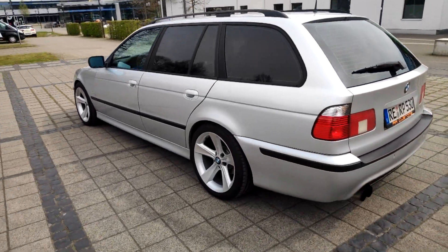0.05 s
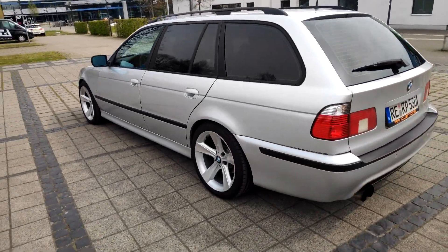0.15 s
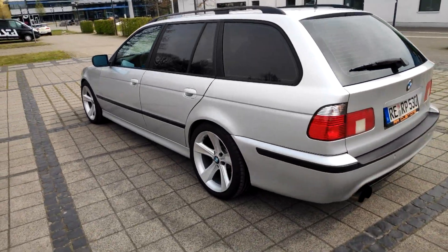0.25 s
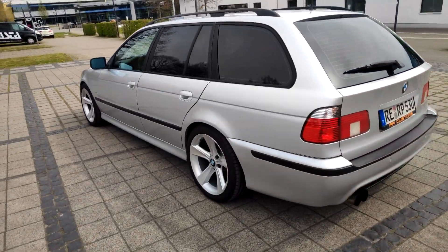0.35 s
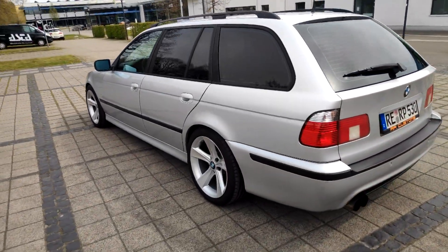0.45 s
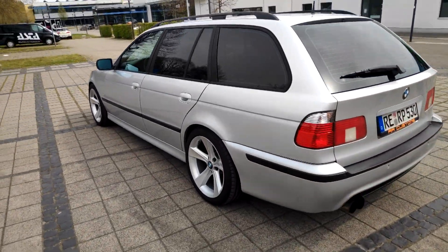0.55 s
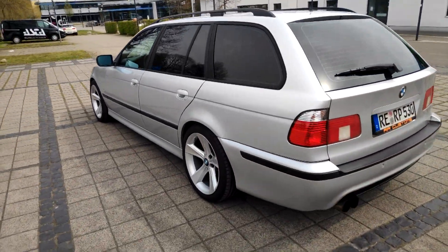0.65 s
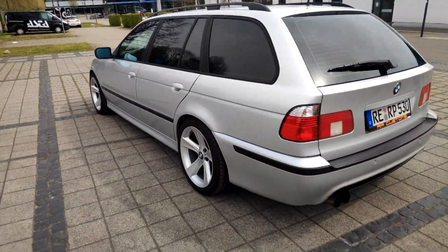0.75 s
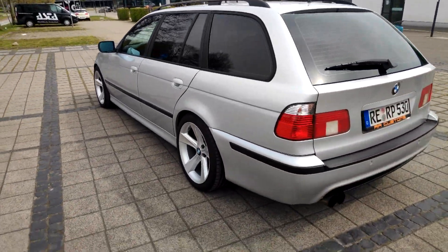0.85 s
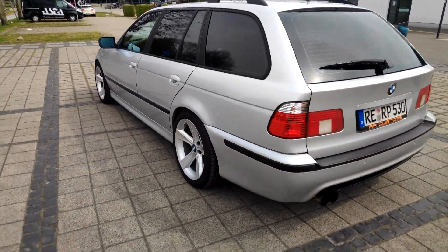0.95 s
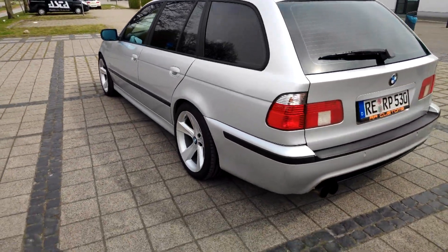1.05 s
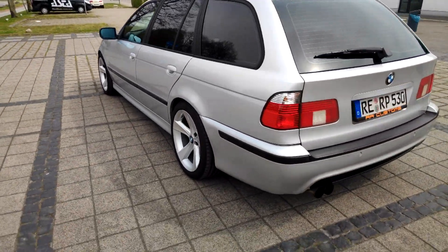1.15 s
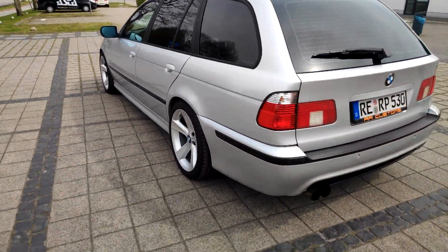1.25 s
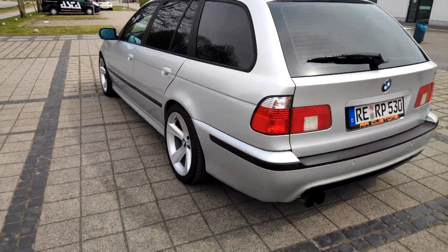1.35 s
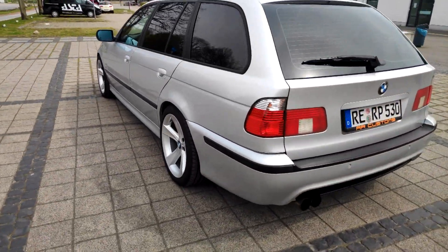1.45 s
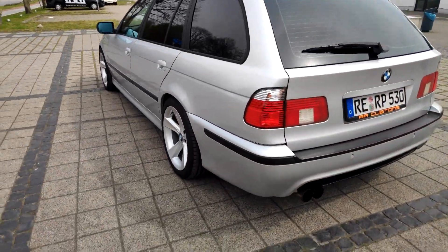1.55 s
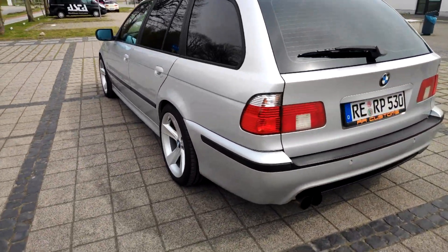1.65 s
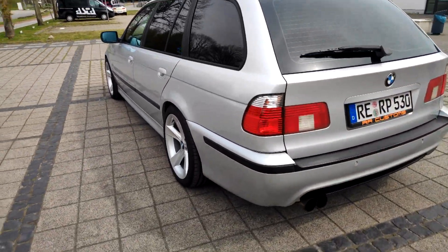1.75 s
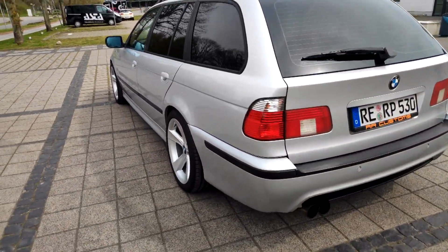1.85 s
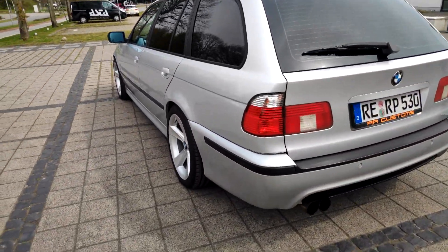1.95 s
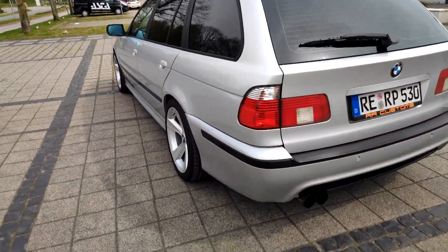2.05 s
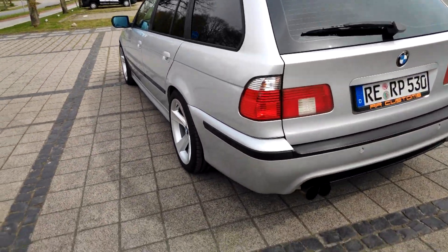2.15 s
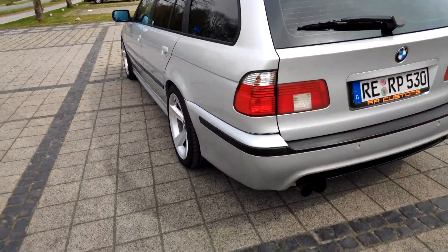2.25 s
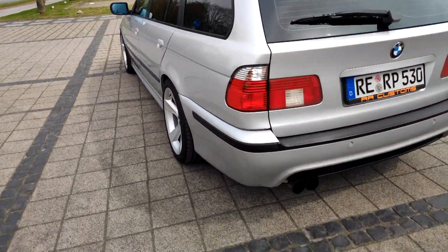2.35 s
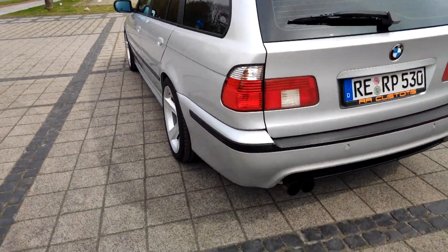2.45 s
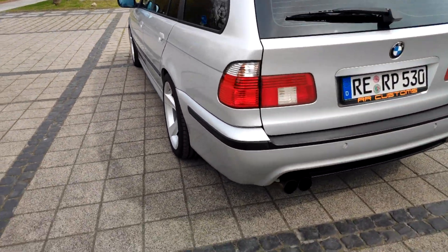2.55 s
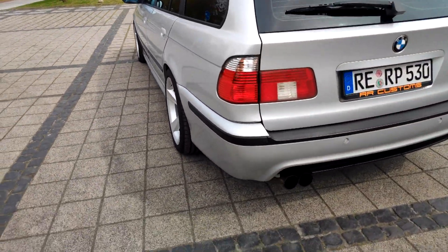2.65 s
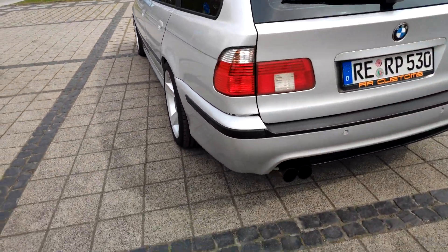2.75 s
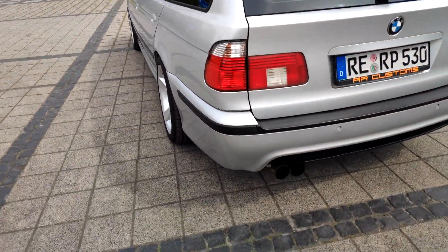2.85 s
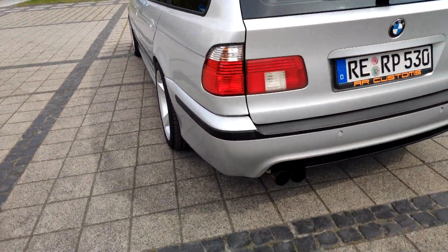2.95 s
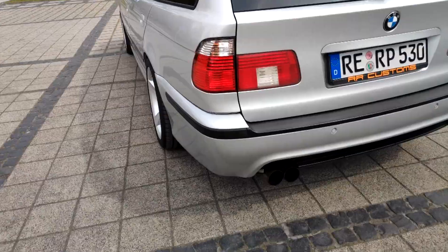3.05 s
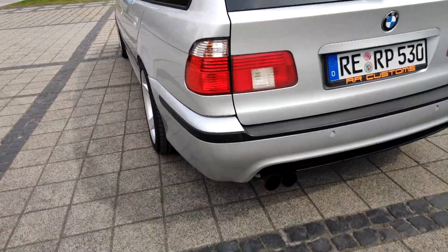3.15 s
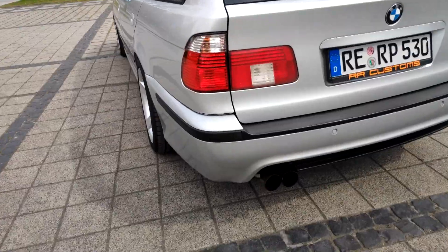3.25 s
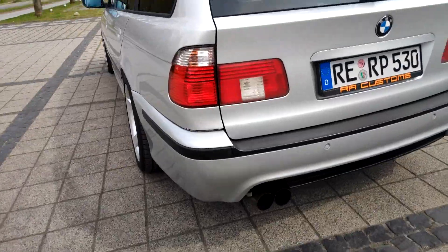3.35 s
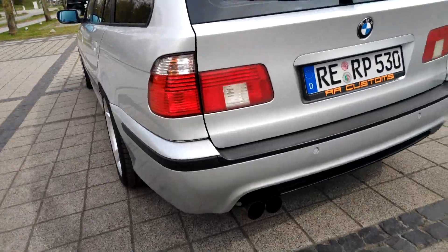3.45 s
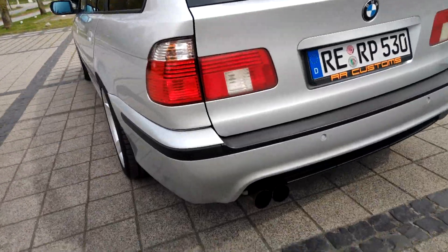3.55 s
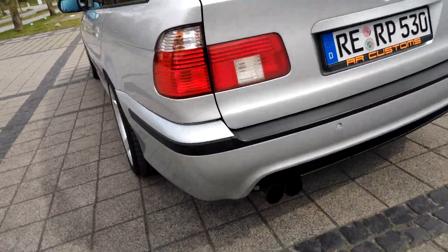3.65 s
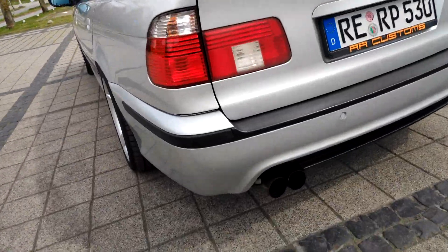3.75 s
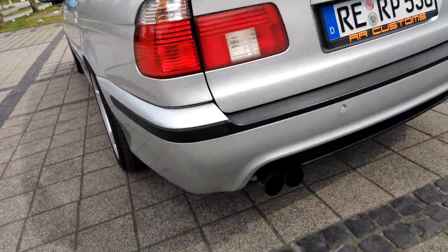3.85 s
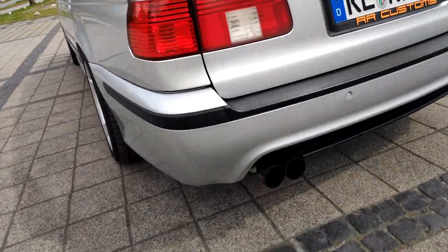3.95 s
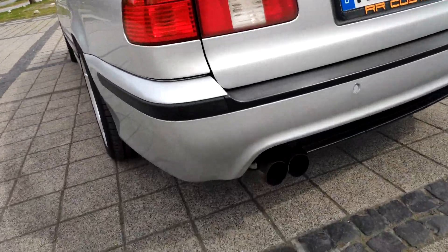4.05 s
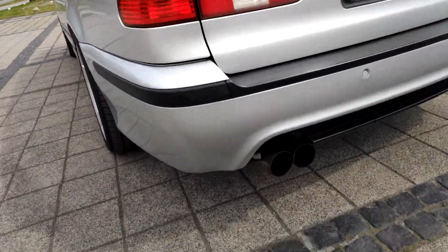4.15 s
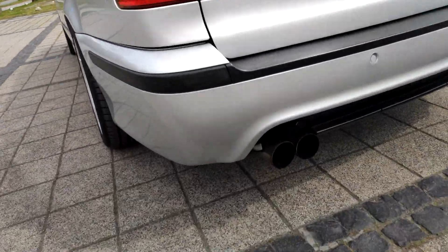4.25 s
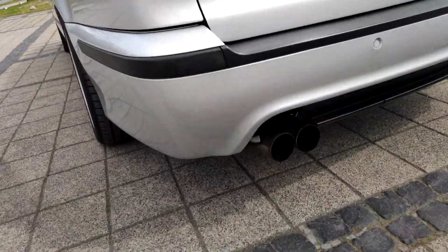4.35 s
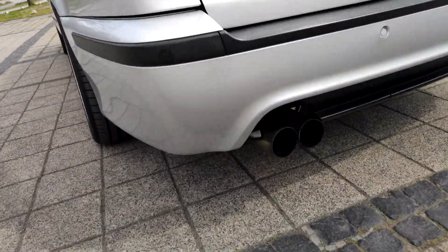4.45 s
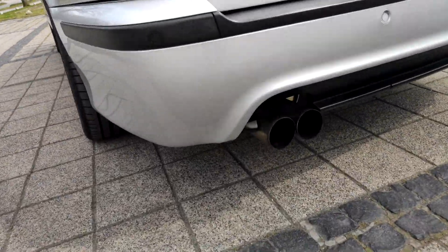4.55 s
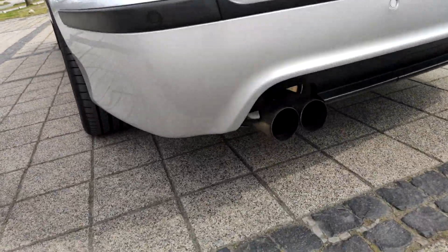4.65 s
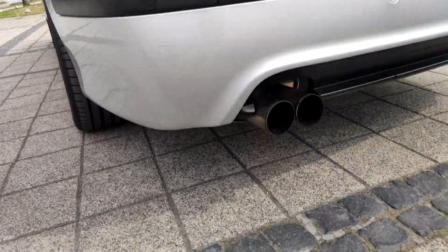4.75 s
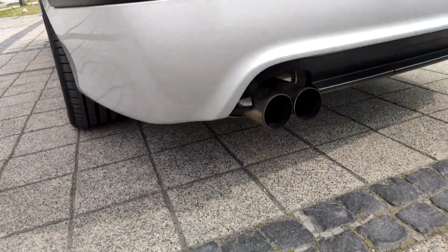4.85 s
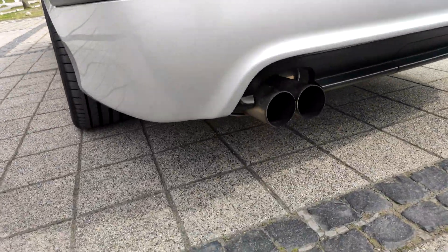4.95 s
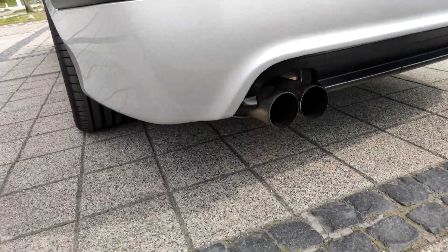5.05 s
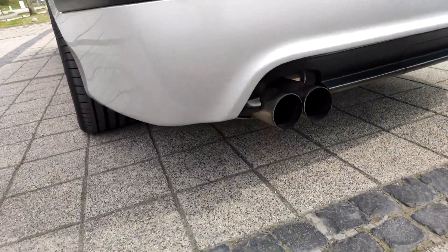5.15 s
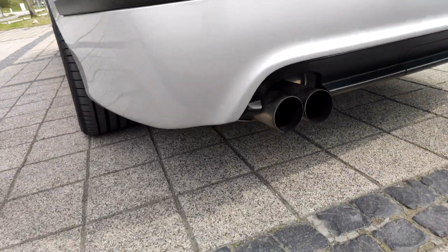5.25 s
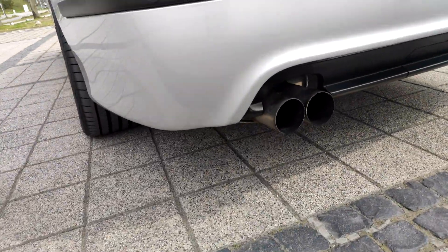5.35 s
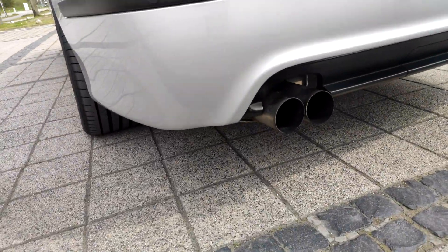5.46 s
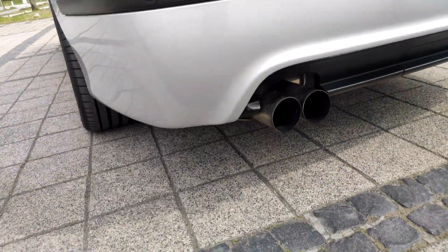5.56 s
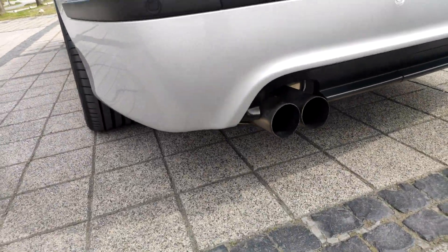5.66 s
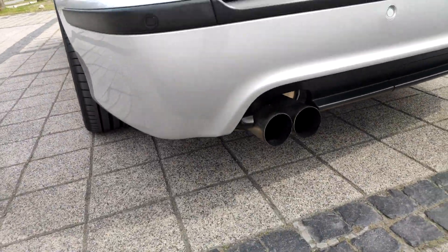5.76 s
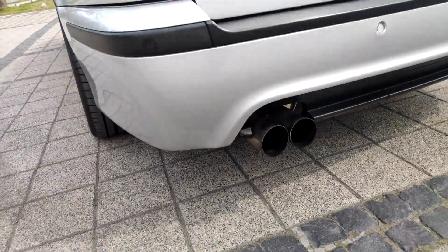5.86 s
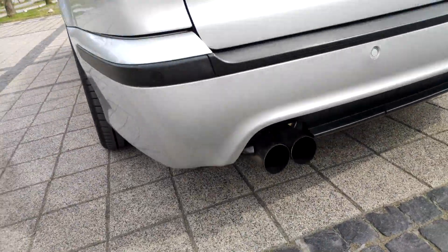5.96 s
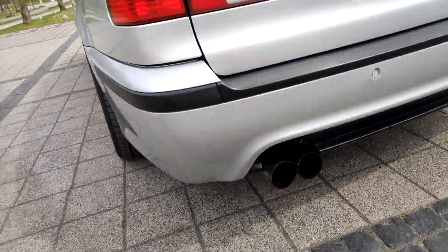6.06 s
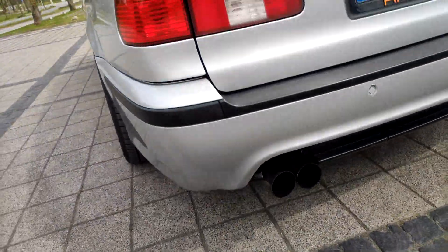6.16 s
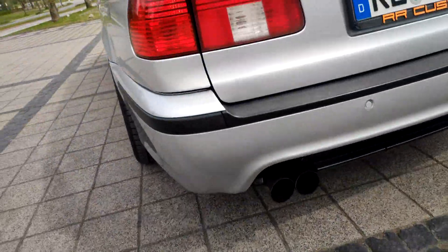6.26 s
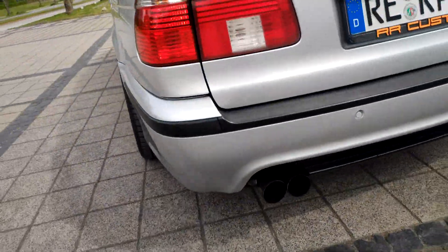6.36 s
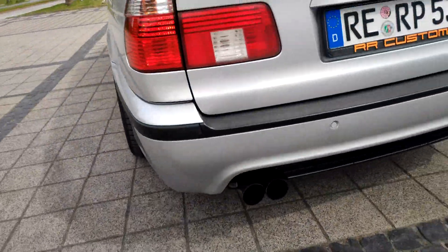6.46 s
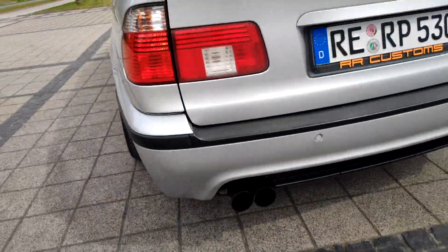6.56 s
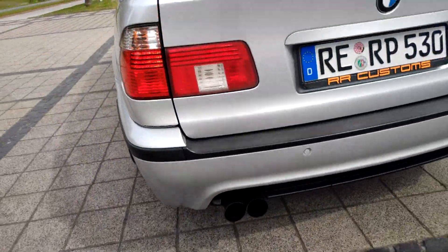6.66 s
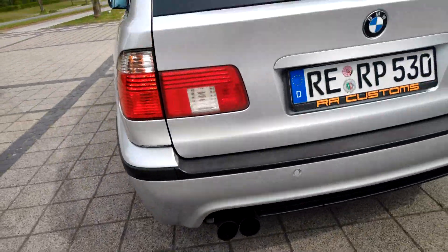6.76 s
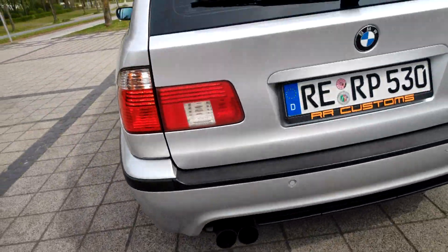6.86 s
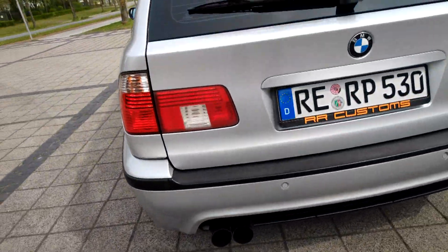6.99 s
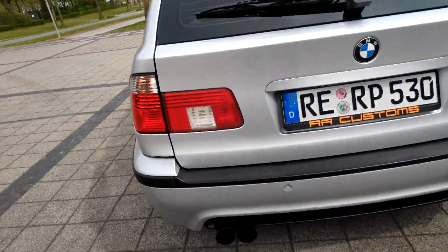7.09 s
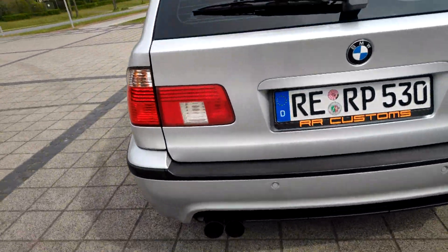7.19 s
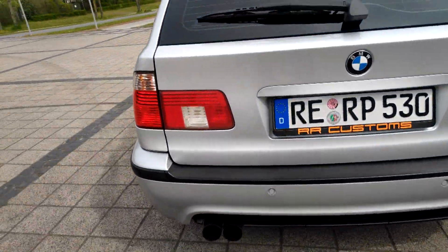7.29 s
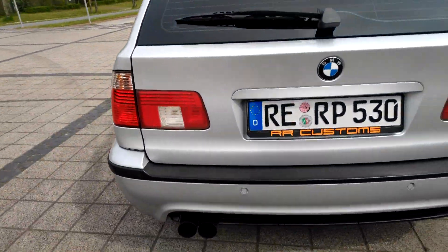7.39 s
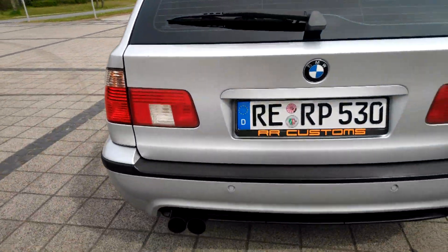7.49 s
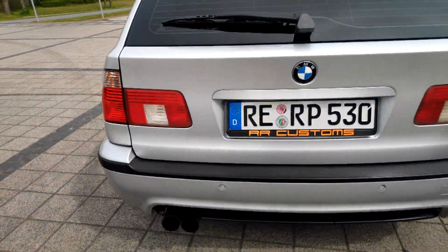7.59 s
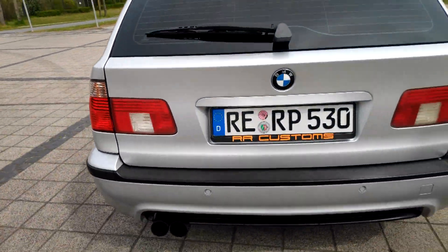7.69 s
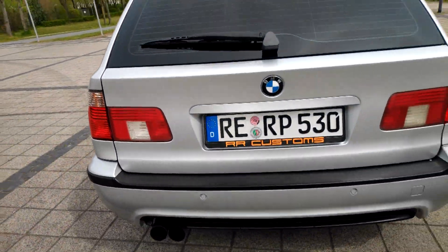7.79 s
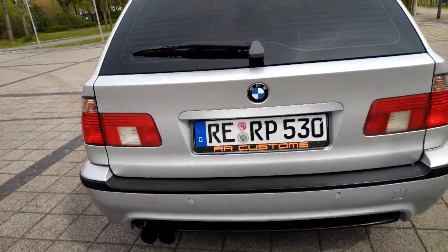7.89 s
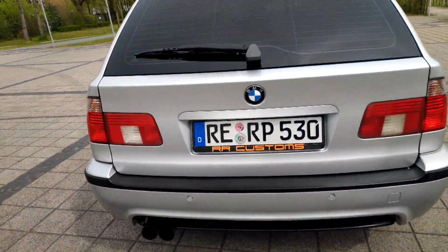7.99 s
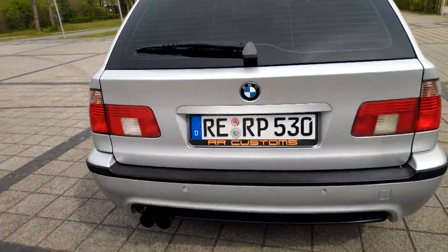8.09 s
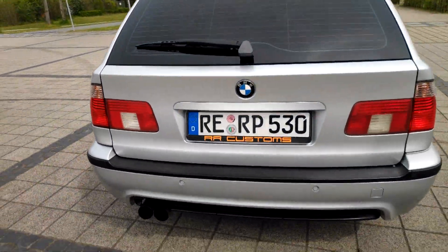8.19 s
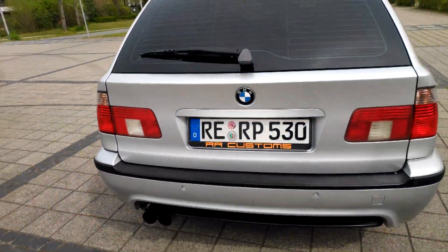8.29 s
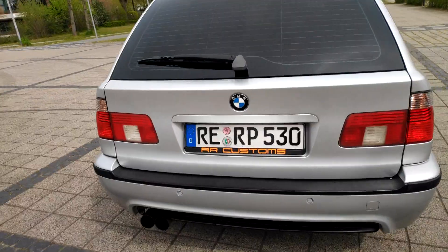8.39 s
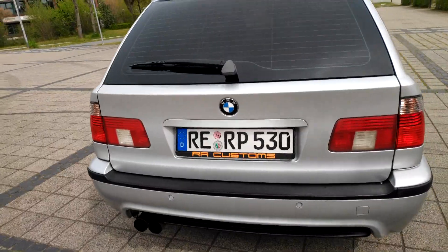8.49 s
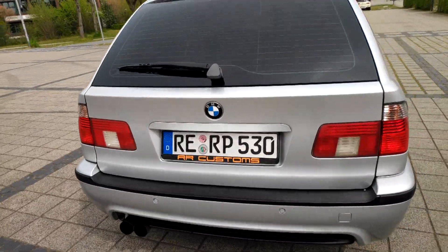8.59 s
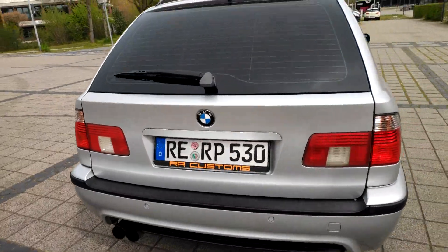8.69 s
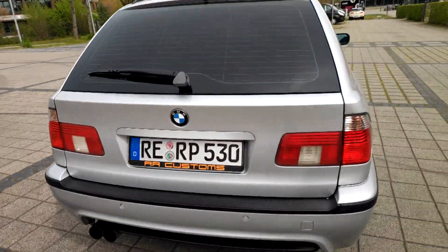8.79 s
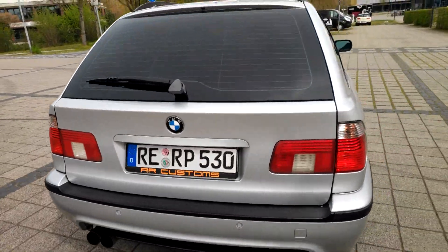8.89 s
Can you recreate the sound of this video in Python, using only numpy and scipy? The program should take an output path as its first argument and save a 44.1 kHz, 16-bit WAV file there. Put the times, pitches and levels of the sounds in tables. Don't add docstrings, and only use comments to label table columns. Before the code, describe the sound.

A diesel six-cylinder car idles steadily outdoors, clattering and hissing; the microphone moves to the tailpipes, roars and pops with exhaust wind, then backs away.

```python
import sys
import numpy as np
from scipy import signal
from scipy.fft import rfft, irfft, next_fast_len
from scipy.io import wavfile
from scipy.ndimage import map_coordinates

SR = 44100
rng = np.random.default_rng(int(sys.argv[2]) if len(sys.argv) > 2 else 0)


def wav_out(sig):
    wavfile.write(sys.argv[1], SR, np.round(np.clip(np.atleast_2d(sig).T, -1, 1) * 32767).astype(np.int16))


def gain_from_decibels(decibels):
    exponent = np.asarray(decibels, float) / 20
    return 10 ** exponent


N = 393813
TOP_HZ = 15830

# time_s, exhaust_db
NEARNESS = [(0, -22), (1.2, -20.5), (2.8, -18.5), (3.6, -16.5), (4, -16.5), (4.3, -14.5), (4.5, -12),
            (4.8, -11.6), (5.6, -11.5), (6, -12), (6.4, -15), (6.8, -15.5), (7.6, -17.5), (8, -19.2),
            (8.93, -21)]
# time_s, station (0 flank, 1 low by the bumper, 2 upright behind)
WALK = [(0, 0.03), (.7, 0.05), (1.62, 0.14), (1.95, 0.31), (3.05, 0.36), (3.45, 1), (6.4, 1), (7.2, 1.54),
        (7.6, 2), (8.25, 2), (8.6, 1.74), (9, 1.75)]
# frequency_hz, density_db (per Hz)
HISS_REAR = [(1290, -25.5), (2200, -1), (3090, -0.5), (4840, -8.5), (6110, -9), (7520, -13), (8240, -18),
             (15800, -30.5)]


def unit(x):
    return x / np.sqrt(np.mean(x ** 2) + 1e-20)


def curves(rows):
    time_s, *columns = np.transpose(rows)
    return [np.interp(np.arange(N) / SR, time_s, column) for column in columns]


def wobble(rate):
    at = np.arange(0, N + 16, 16)
    knots = rng.standard_normal(int(N * rate / SR) + 4)
    return np.interp(np.arange(N), at, map_coordinates(knots, [at * rate / SR]))


def filtered(x, response):
    m = next_fast_len(N + SR)
    return irfft(rfft(x, m) * response(np.fft.rfftfreq(m, 1 / SR)), m)[:N]


def modes(table):
    return lambda f: sum((-1) ** k * gain_from_decibels(db) * 1j * f * w / (c * c - f * f + 1j * f * w)
                         for k, (c, w, db) in enumerate(table))


def noise(points):
    hz, db = np.transpose(points)
    shape = lambda f: gain_from_decibels(np.interp(np.log(f + 1), np.log(hz + 1), db)) * (f < TOP_HZ)
    return unit(filtered(rng.standard_normal(N), shape))


def beats(cycle, place, scatter_db):
    at = np.searchsorted(cycle, np.arange(int(cycle[-1]) + 1) + place)
    out = np.zeros(N + 1)
    out[at] = gain_from_decibels(scatter_db * rng.standard_normal(len(at)))
    return out[:N]


def engine_cycle():
    # time_s, speed_hz (cycles per second)
    speed = [(0, 6.253), (2, 6.25), (3.5, 6.256), (4.5, 6.249), (6, 6.242), (9, 6.236)]
    return .029 + np.cumsum(curves(speed)[0]) / SR


def exhaust(cycle):
    # lag_ms, size_db
    cylinders = [(6.99, -1.15), (7.18, 1.15), (7.28, -.15), (6.94, -.95), (7.64, 1.3), (7.13, -.2)]
    # frequency_hz, width_hz
    volumes = [(25, 19), (66.1, 20.5)]
    # place (in cycle, 0-1), level_db
    shell_kicks = [(.102, -2), (.45, 0)]
    level_db, = curves(NEARNESS)
    shell_db = -38 + .52 * (level_db - level_db.mean())
    puffs = sum(gain_from_decibels(db) * beats(cycle, k / 6 + ms / 160, scatter_db=.8)
                for k, (ms, db) in enumerate(cylinders))

    def pipe_response(f):
        tailpipe = 1 / (1 - (f / 115.4) ** 2 + 1j * f / 400)
        soft_front = 1 / (1 + 1j * f / 236) ** 2
        return tailpipe * soft_front * np.prod([modes([(c, w, 0)])(f) for c, w in volumes], axis=0)

    pipe = filtered(puffs, pipe_response)
    kicks = sum(gain_from_decibels(db) * beats(cycle, place, scatter_db=1.5) for place, db in shell_kicks)
    shell = -filtered(kicks, lambda f: modes([(200.5, 10, 0)])(f) * modes([(230, 50, 0)])(f))
    return gain_from_decibels(level_db) * unit(pipe) + gain_from_decibels(shell_db) * unit(shell)


def knocks(cycle, table, lag):
    out, turns = np.zeros(N), np.arange(int(cycle[-1]) + 1)[:, None]
    for hz, db, hardest, times in table:
        peak_s = .002 + 4 / hz
        t = np.arange(round(7 * peak_s * SR)) / SR
        ring = gain_from_decibels(db) * t / peak_s * np.exp(1 - t / peak_s) * np.sin(2 * np.pi * hz * t)
        firings = lag + np.arange(6) / 6
        softer_db = 23 * np.abs(np.sin(np.pi * times * (firings - hardest))) ** .7
        late, size_db = rng.standard_normal((2, len(turns), 6))
        at = np.searchsorted(cycle, turns + firings - 6.25 * peak_s + .002 * late)
        hits = np.bincount(at.ravel(), gain_from_decibels(size_db - softer_db).ravel(), N + 1)
        out += signal.oaconvolve(hits, ring)[:N]
    return out


def clatter(cycle, station):
    # frequency_hz, level_db, hardest (place in cycle, 0-1), hard_knocks (per cycle)
    flank_knocks = [(590, -50, .045, 1), (590, -54, .712, 1), (770, -47, .07, 1), (770, -41, .78, 1),
                    (855, -36.5, .63, 1), (845, -42, .13, 1), (1330, -46, .378, 2), (1330, -55, .045, 6),
                    (1620, -54, .045, 6), (845, -50, .88, 1)]
    low_knocks = [(590, -53, .065, 1), (590, -50, .732, 1), (852, -34, .148, 2), (790, -52, .232, 2),
                  (955, -52, .398, 1), (1360, -53, .398, 1), (1360, -53, .065, 3), (1700, -57, .732, 1),
                  (2010, -60, .065, 3), (3510, -57, .63, 1)]
    rear_knocks = [(610, -50, .272, 3), (850, -41.5, .105, 1), (858, -37.5, .69, 1), (835, -40, .8, 1),
                   (790, -48, .105, 1), (790, -48, .772, 1), (1390, -57, .33, 2), (1680, -58, .105, 2),
                   (2025, -57, .772, 1)]
    front_knocks = [(950, -45, .878, 1), (950, -52, .25, 1), (1520, -52, .378, 3), (1720, -47.5, .045, 1),
                    (1740, -52, .045, 6), (2040, -58, .045, 3), (4450, -59, .045, 6), (7600, -66, .045, 6),
                    (3480, -52, .045, 3)]
    injector = [(2040, -44.5, .712, 1)]
    knock_lag = (.045, .065, .105)
    out = np.zeros(N)
    for k, table in enumerate((flank_knocks, low_knocks, rear_knocks)):
        share = np.clip(1 - np.abs(station - k), 0, 1) ** 1.66
        out += share * knocks(cycle, table, knock_lag[k])
    out += np.clip(1 - station, 0, 1) ** 4.8 * knocks(cycle, front_knocks, knock_lag[0])
    out += knocks(cycle, injector, knock_lag[0]) / (1 + (station / .125) ** 12)
    return gain_from_decibels(2) * out


def block_drone():
    # frequency_hz, width_hz, level_db
    block = [(314, 90, -1), (624, 96, -1), (850, 78, 0.5), (1312, 342, -2), (1737, 396, -2.5),
             (2040, 170, -4.5)]
    return unit(filtered(rng.standard_normal(N), lambda f: modes(block)(f) / (1 + 1j * f / 2400) ** 2))


def flank_hiss(station):
    # frequency_hz, density_db (per Hz)
    spectrum = [(1290, -35), (2200, -4), (2640, -14.5), (3430, -5.5), (3900, -8.5), (5680, -8.5),
                (8500, -15.5), (15800, -31)]
    # frequency_hz, width_hz, level_db
    grille = [(c, w, .25 * db) for c, w, db in [(3600, 240, -4.5), (4590, 130, -1), (5180, 280, -7.5),
                                                (5710, 110, -4), (6250, 56, -7.5), (7380, 130, -15),
                                                (8800, 100, -13.5)]]
    hiss = unit(filtered(noise(spectrum), lambda f: 1 + gain_from_decibels(-4.5) * np.abs(modes(grille)(f))))
    sag = 1 - .055 * np.clip(station / .13, 0, 1) ** 2
    hiss = map_coordinates(hiss, [np.cumsum(sag) - 1])
    echo_lag = (1.14 + .8 * station) * SR / 1000
    paving = filtered(hiss, lambda f: 1 / (1 + (f / 5000) ** 4))
    return unit(hiss + gain_from_decibels(-6) * map_coordinates(paving, [np.arange(N) - echo_lag]))


def rear_hiss(station):
    # frequency_hz, width_hz, level_db
    underside = [(2190, 60, 0), (2800, 64, 1), (3030, 40, 0), (3680, 80, -1), (4670, 65, -3)]
    tailgate = [(1420, 62, 0), (2020, 50, 0), (3000, 90, -3)]
    air, upright = noise(HISS_REAR), np.clip(station - 1, 0, 1)
    low, high = [unit(filtered(air, lambda f: 1 + gain_from_decibels(-1.5) * np.abs(modes(table)(f)) ** 2))
                 for table in (underside, tailgate)]
    return (1 - upright) * low + upright * high


def side_gap():
    # frequency_hz, width_hz, level_db
    gap = [(2690, 120, -3), (3760, 130, 0)]
    opening = np.clip((np.arange(N) / SR - 8.4) / .1 + 1, 0, 1)
    return gain_from_decibels(-63) * unit(filtered(noise(HISS_REAR), modes(gap))) * opening


def turbo_whine():
    # frequency_hz, level_db
    whistle = [(6336, -78)]
    t = np.arange(N) / SR
    return sum(gain_from_decibels(db + 3.6 * wobble(4.6)) * np.sin(2 * np.pi * hz * t + 1.6 * wobble(25))
               for hz, db in whistle)


def engine_bay(cycle):
    # station, drone_db, hiss_db
    shadow = [(0, -48.5, -53), (.1, -50, -55.5), (.35, -48, -60), (1, -50.5, -54), (1.4, -49.5, -56),
              (2, -51, -56)]
    station, = curves(WALK)
    at, *through = np.transpose(shadow)
    drone_db, hiss_db = [np.interp(station, at, db) + 0.43 * wobble(4.1) for db in through]
    firing = np.cos(2 * np.pi * (6 * cycle - .3))
    rear = np.clip(1.12 * station, .1, 1)
    hiss = np.sqrt(1 - rear) * flank_hiss(station) + np.sqrt(rear) * rear_hiss(station)
    hiss *= gain_from_decibels(hiss_db + .5 + 1.0 * firing + 1.03 * wobble(25))
    drone = block_drone() * gain_from_decibels(drone_db + 2.2 * firing + 0.37 * wobble(13))
    return drone + hiss + clatter(cycle, station) + side_gap() + turbo_whine()


def pops():
    # start_s, slip_db, swing_db, rise_ms, recovery_ms
    slips = [(3.499, -22, -13, 1, 20), (4.2466, -17, 2, 1.2, 7), (5.2892, -20, -13, .6, 8),
             (5.29, -60, -7, 9, 35), (5.7104, -30, -16, .5, 8), (5.7117, -21, -5, 1.1, 40)]
    # centre_s, pressure, length_ms
    slugs = [(3.638, -.45, 9), (4.1486, -.5, 7), (4.2022, -.5, 6), (4.2455, -.3, 6), (4.3355, -.6, 7),
             (4.3599, -.6, 10), (4.3724, -.6, 6), (4.4042, -.9, 6), (4.4077, .9, 7), (4.4401, -.5, 9),
             (4.4613, .6, 8), (4.4668, -.4, 8), (4.493, -.45, 8), (4.6001, -.3, 9), (4.9208, -.12, 14),
             (5.4007, -.08, 14), (5.4806, -.1, 14), (5.5611, -.22, 13), (5.8817, -.08, 14), (8.535, .3, 50),
             (8.567, -.35, 26), (8.803, .25, 16)]
    # centre_s, pressure, frequency_hz, length_ms
    eddies = [(3.625, .14, 150, 20), (3.64, .07, 303, 20), (3.67, -.15, 200, 14), (3.695, -.12, 150, 16),
              (3.848, .07, 347, 11), (3.916, -.11, 309, 13), (3.942, .05, 330, 14), (3.992, -.12, 312, 12),
              (3.995, .3, 140, 22), (4.017, .07, 327, 7), (4.043, -.22, 203, 17), (4.076, -.14, 221, 10),
              (4.127, .16, 195, 12), (4.086, .15, 308, 13), (4.098, .3, 150, 30), (4.1, -.12, 331, 7),
              (4.129, .1, 288, 11), (4.16, .2, 190, 10), (4.179, .16, 322, 13), (4.197, .16, 313, 11),
              (4.232, -.2, 190, 14), (4.268, -.1, 352, 7), (4.282, .17, 172, 10), (4.307, -.11, 294, 16),
              (4.314, -.24, 172, 10), (4.367, .11, 297, 13), (4.386, -.2, 130, 24), (4.386, -.13, 337, 7),
              (4.42, .25, 95, 40), (4.432, .1, 305, 12), (4.434, -.3, 182, 24), (4.485, -.19, 187, 10),
              (4.56, -.15, 203, 10), (4.621, -.05, 309, 14), (4.625, -.13, 183, 10), (4.84, .1, 176, 24),
              (4.929, -.04, 325, 15), (4.988, .14, 167, 11), (5.045, -.1, 187, 19), (8.401, -.11, 168, 16),
              (8.433, .15, 55, 40), (8.486, -.2, 95, 30), (8.493, -.1, 168, 24), (8.494, -.04, 329, 8),
              (8.577, -.04, 250, 17), (8.671, -.12, 153, 24), (8.695, .2, 85, 40), (8.815, -.12, 155, 24)]
    out, t = np.zeros(N + SR), np.arange(SR // 2) / SR
    pull = np.hanning(round(.012 * SR))
    for s, slip_db, swing_db, rise_ms, fall_ms in slips:
        swing = gain_from_decibels(slip_db) + gain_from_decibels(swing_db) * (1 - np.exp(-1000 * t / rise_ms))
        out[round(s * SR):][:len(t)] += swing * np.exp(-1000 * t / fall_ms)
        out[round((s - .007) * SR):][:len(pull)] -= gain_from_decibels(swing_db - 9) * pull
    for s, pressure, ms in slugs:
        push = pressure * np.hanning(round(ms * SR / 1000))
        out[round((s - ms / 2000) * SR):][:len(push)] += push
    for s, pressure, hz, ms in eddies:
        u = np.arange(-2 * ms, 2 * ms, 1000 / SR) / 1000
        swell = gain_from_decibels(-.3) * pressure * np.exp(-2.8 * (1000 * u / ms) ** 2)
        out[round((s + u[0]) * SR):][:len(u)] += swell * np.cos(2 * np.pi * hz * u)
    return filtered(out[:N], lambda f: (f < TOP_HZ) * 1j * f / (3 + 1j * f))


def gust_levels():
    # peak_s, peak_db, fall_s (by 20 dB), edge_db (over buffet)
    gusts = [(0.571, -40.5, .1, -7), (2.38, -41.5, 0.4, -7), (3.13, -36, 0.08, -5), (3.33, -33.5, 0.3, -13),
             (3.42, -39, 0.23, -6), (3.635, -21, 0.09, -4.5), (3.71, -24, 0.07, -9),
             (3.83, -25.5, 0.16, -4), (3.918, -23.5, 0.12, -3.5), (4, -22.5, .1, -3.5),
             (4.05, -26.5, 0.15, -4), (4.095, -20.5, 0.11, -1.5), (4.18, -22.5, .1, -2.5),
             (4.235, -21.5, .1, -3), (4.32, -20, 0.11, -1), (4.41, -18, 0.11, -1.5), (4.47, -24, .15, -3),
             (4.6, -29, 0.2, -2), (4.82, -37, 0.5, -2), (4.97, -30, .15, -5.5), (5.07, -33.5, 0.3, -12.5),
             (5.3, -38.5, 0.4, -4), (5.55, -41.5, .2, -7.5), (5.72, -39, 0.3, -10.5),
             (7.66, -37, 0.53, -23), (8.41, -30.5, 0.17, -7.5), (8.485, -28, 0.03, -7.5),
             (8.57, -29, 0.12, -20), (8.68, -27, 0.06, -11), (8.815, -28, 0.12, -13),
             (8.93, -43, 0.4, -6.5)]
    sways = [2.41, 3.17, 3.55, 5.3, 5.72, 6.74, 7.16, 8.55]
    now, near_db = np.arange(0, N, 64) / SR, curves(NEARNESS)[0][::64]
    slow = lambda rate: wobble(rate)[::64]
    s, db, fall_s, edge_db = np.transpose(gusts)[..., None]
    power = gain_from_decibels(db - 20 * np.abs(now - s) / fall_s) ** 2
    breeze_db = -48.5 + .3 * (near_db - near_db.mean()) + 3 * slow(12)
    buffet = gain_from_decibels(breeze_db) ** 2 + power.sum(axis=0)
    sheltered_db = -45.5 - 2 * curves(WALK)[0][::64] + 1.3 * slow(8)
    edge = gain_from_decibels(sheltered_db) ** 2 + (power * gain_from_decibels(edge_db) ** 2).sum(axis=0)
    sway = sum(np.exp(-.5 * ((now - s) / .086) ** 2) for s in sways)
    most = gain_from_decibels(-22.5)
    heave = np.minimum(gain_from_decibels(5.5 + 4.5 * slow(9)) * np.sqrt(buffet) + most * sway, most)
    return [np.interp(np.arange(N) / SR, now, 10 * np.log10(p)) for p in (buffet, heave ** 2, edge)]


def wind():
    # frequency_hz, density_db (per Hz)
    buffet_spectrum = [(15, -7.5), (30, -8), (60, -1.5), (130, -5.5), (220, -11), (350, -32), (600, -87)]
    edge_spectrum = [(150, -20), (250, 7), (320, 1), (420, -5), (600, -14.5), (1000, -33), (2000, -79)]
    buffet_db, heave_db, edge_db = gust_levels()
    hard = np.clip((buffet_db + 52) / 22, .3, .85)
    lumps = hard * wobble(18)
    buffet = unit(gain_from_decibels(2.4 * lumps) * noise(buffet_spectrum))
    edge = unit(gain_from_decibels(1.4 * lumps + 1.6 * hard * wobble(45)) * noise(edge_spectrum))
    heave = noise([(2, -28), (6, 6.0), (18, 12.5), (30, -9), (60, -77.5)])
    buffet_db = buffet_db + 9.5 - 2.5 * np.clip(hard - .3, 0, 1) / .55
    return gain_from_decibels(buffet_db) * buffet + gain_from_decibels(edge_db - 3) * edge + gain_from_decibels(heave_db) * heave


def handling():
    # start_s, crack_db, thud_db, thud_hz, thud_t60_ms
    ticks = [(1.615, -60, -44, 6900, 9), (2.355, -46, -58, 890, 7), (2.856, -50, -60, 10900, 2),
             (2.872, -52, -40, 1200, 4), (2.8791, -23, -9, 560, 6.5), (2.8792, -60, -22, 950, 5),
             (2.8793, -60, -24, 2800, 1.2), (2.8846, -33, -38, 5000, 1.5), (2.889, -38, -19.5, 720, 7),
             (2.9012, -44, -45, 1500, 4), (3.0, -60, -33, 3500, 1.2), (3.01, -52, -55.5, 14000, 1.5),
             (3.1411, -42, -20, 654, 7), (3.141, -60, -21, 2200, 1.5), (3.1411, -60, -30, 6000, .8),
             (3.337, -40, -36, 8000, 1.2), (3.628, -51, -61, 13900, 2), (5.248, -47, -55, 900, 7),
             (4.052, -58.5, -36, 2700, 6), (3.84, -56, -34, 600, 10), (6.372, -52, -39.5, 4640, 6),
             (6.395, -50.5, -40, 4610, 6), (6.96, -48, -55, 880, 7), (7.309, -54, -59, 890, 7),
             (8.375, -46, -50, 6000, 1.5), (8.382, -55, -38, 2300, 4), (8.4095, -36, -40, 7000, 1),
             (8.4132, -36, -40, 8000, 1), (8.4155, -42, -50, 13000, 1), (8.4195, -35, -40, 7000, 1),
             (8.426, -42, -45, 6000, 1), (8.625, -44, -20, 1330, 7.5), (8.632, -52, -36, 1400, 5),
             (8.65, -47, -50, 1310, 7)]
    # start_s, level_db
    clinks = [
        (2.392, -53),
        (3.535, -67),
    ]
    # frequency_hz, level_db, t60_s
    clink_modes = [(5066, -6, 0.06), (7849, -33, 5.0), (12400, 6, 0.038), (13770, -30, 0.056),
                   (15040, 3, 0.04), (15900, -23, 0.066)]
    # centre_s, half_length_s, level_db, centre_hz
    scuffs = [(.02, 0.078, -61, 7000), (.5, .15, -74, 9000), (1.55, 0.057, -61, 6500),
              (1.56, .05, -72.5, 14000), (2, 0.14, -70.5, 7950), (2.65, .06, -71, 11000),
              (3.13, 0.06, -63, 7000), (3.18, .025, -76, 14500), (3.358, 0.081, -60.5, 6000),
              (3.451, 0.12, -65.5, 13000), (2.886, .004, -56.5, 8000), (4.063, .011, -46.5, 2670),
              (6.384, .015, -58, 4600), (6.9, .35, -73, 13900), (8.029, .05, -71.5, 13000),
              (8.376, .018, -60.5, 12000), (8.418, .008, -50, 7000), (8.378, .014, -56, 3000),
              (2.886, .006, -58, 11000), (3.32, .03, -62, 4800), (2.4, .008, -62, 8500)]
    out, t = np.zeros(N + SR), np.arange(SR // 10) / SR
    for s, db, thud_db, thud_hz, ms in ticks:
        burst = .5 * rng.standard_normal(len(t)) - 1.8 * (t == 0)
        crack = gain_from_decibels(db - 60 * t / 0.0031) * signal.lfilter([1], [1, -.55], burst)
        thud = gain_from_decibels(thud_db - 60000 * t / ms) * np.sin(2 * np.pi * thud_hz * t)
        out[round(s * SR):][:len(t)] += crack - thud
    for s, db in clinks:
        out[round(s * SR):][:len(t)] += sum(gain_from_decibels(db + level - 60 * t / t60) * np.sin(2 * np.pi * hz * t)
                                            for hz, level, t60 in clink_modes)
    for s, half, db, hz in scuffs:
        at = np.arange(max(round((s - 3 * half) * SR), 0), round((s + 3 * half) * SR))
        band = signal.butter(2, [hz / 1.7, hz * 1.5], 'bandpass', fs=SR)
        rub = unit(signal.lfilter(*band, rng.standard_normal(len(at))))
        grit = gain_from_decibels((4 if half < .03 else 1.5) * wobble(300)[at])
        out[at] += gain_from_decibels(db) * np.exp(-.5 * ((at / SR - s) / half) ** 2) * grit * rub
    return filtered(out[:N], lambda f: f < TOP_HZ)


def scene():
    cycle = engine_cycle()
    return (exhaust(cycle) + engine_bay(cycle) + pops() + wind() + handling())[None]


def band_limit(x):
    return signal.sosfilt(signal.butter(12, 16870, fs=SR, output="sos"), x)


def record(dry):
    ceiling = .71
    return band_limit(np.clip(dry, -ceiling, ceiling))


dry = scene()
out = record(dry)
wav_out(out)
```